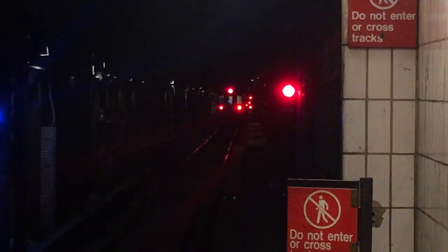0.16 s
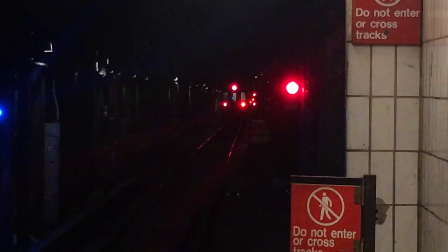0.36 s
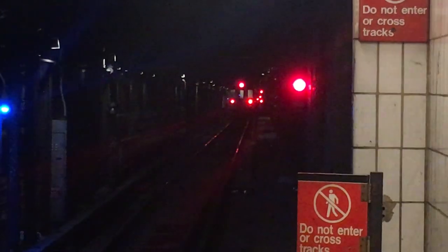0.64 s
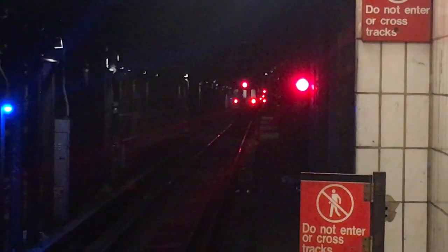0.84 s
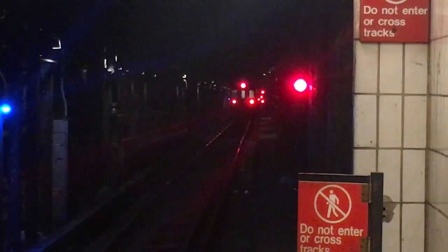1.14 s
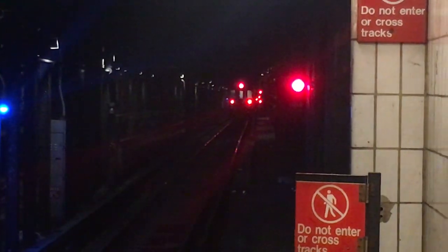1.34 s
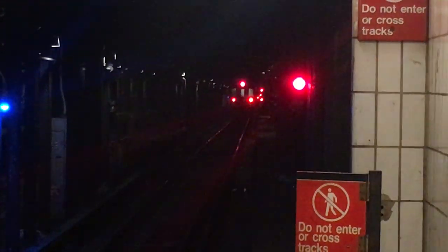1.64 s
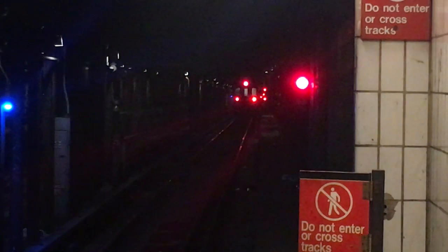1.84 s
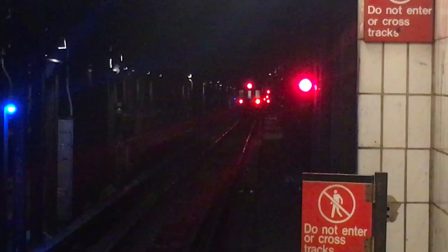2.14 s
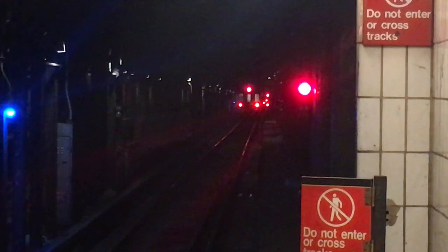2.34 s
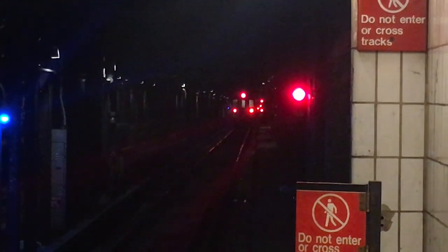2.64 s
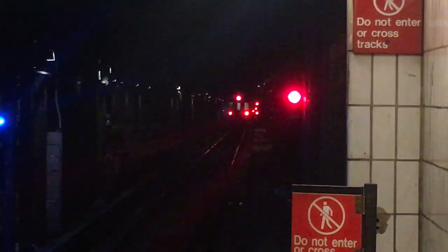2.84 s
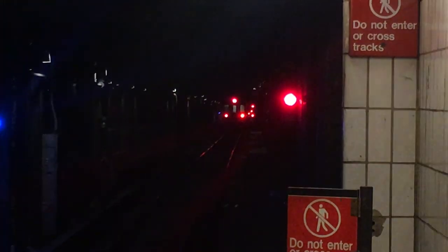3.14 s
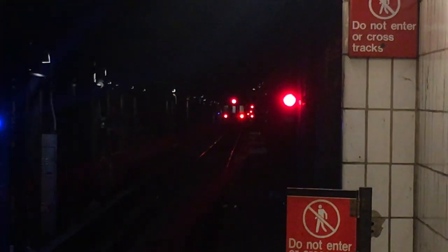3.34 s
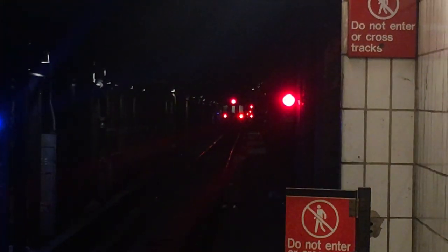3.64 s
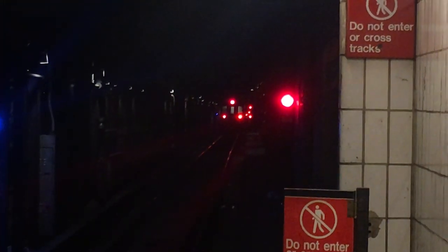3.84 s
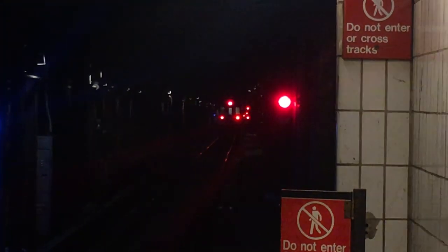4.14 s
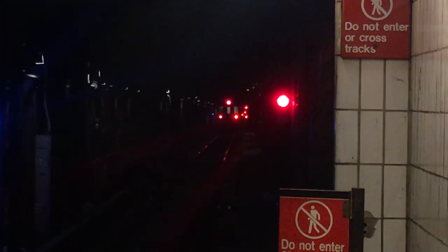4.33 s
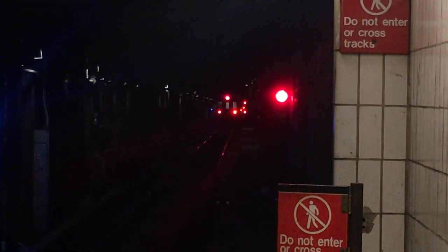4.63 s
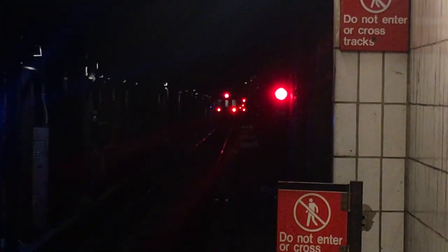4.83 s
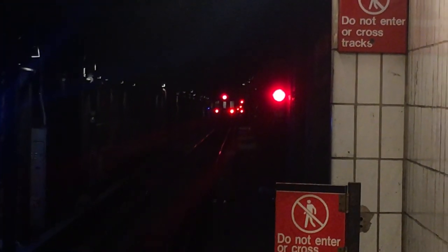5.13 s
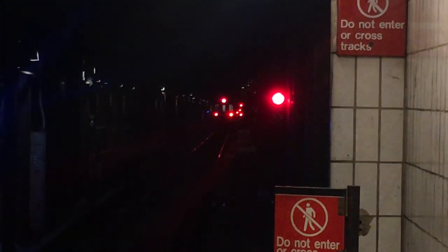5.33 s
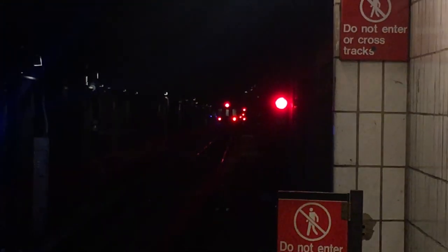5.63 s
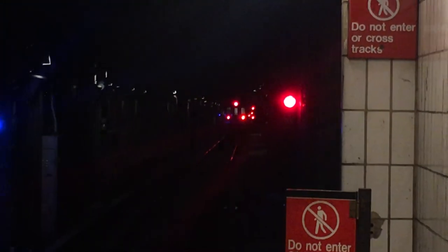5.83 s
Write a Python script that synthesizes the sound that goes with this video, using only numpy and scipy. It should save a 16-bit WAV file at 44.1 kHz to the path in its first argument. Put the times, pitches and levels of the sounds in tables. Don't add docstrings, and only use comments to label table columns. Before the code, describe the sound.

Low, thudding rumble of a receding subway train booms through a tunnel, with faint metallic chirps and scrapes over soft hiss.

```python
import sys
import numpy as np
from scipy import signal
from scipy.io import wavfile
from scipy.ndimage import uniform_filter1d

SR = 44100
rng = np.random.default_rng(int(sys.argv[2]) if len(sys.argv) > 2 else 0)


def to_linear_factor(level_db):
    exponent = np.asarray(level_db, float) / 20
    return 10 ** exponent


def to_wav(s):
    ch = np.atleast_2d(s).T
    pcm = np.round(np.clip(ch, -1, 1) * 32767)
    wavfile.write(sys.argv[1], SR, pcm.astype(np.int16))


N = 263704
TIME = np.arange(N) / SR


def evened(x):
    return x / np.sqrt(np.mean(x ** 2) + 1e-20)


def read(points, hz):
    f, value = np.transpose(points)
    return np.interp(np.log(hz + 1), np.log(f + 1), value)


def singing(count, hz, width_hz, steady):
    r = np.exp(-np.pi * width_hz / SR)
    settle = 4000
    noise = rng.standard_normal((count + settle, 2)) @ [1, 1j]
    envelope = signal.lfilter([1], [1, -2 * r, r * r], noise)[settle:]
    swell = uniform_filter1d(abs(envelope) ** 2, round(.06 * SR))
    envelope = envelope / swell ** (np.clip(steady, 0, 1) / 2)
    phase = 2 * np.pi * np.cumsum(hz * np.ones(count)) / SR
    return evened((envelope * np.exp(1j * phase)).real)


def field(gain_db):
    frames, hz = N // 256 + 5, np.fft.rfftfreq(1024, 1 / SR)
    a, b = rng.standard_normal((frames, 513, 2)).T
    z = (a + 1j * b) * to_linear_factor(gain_db(hz[:, None], np.arange(frames) * 256 / SR))
    return signal.istft(z, nperseg=1024, noverlap=768)[1][:N]


def patches(patchy_db):
    chance = rng.standard_normal((N // 256 + 5, 513)).T
    smooth = uniform_filter1d(chance, size=14, axis=0)
    smooth = uniform_filter1d(smooth, size=12, axis=1)
    return patchy_db * evened(smooth)


def boom():
    # [f/Hz, width/Hz, steadiness 0-1]
    modes = [(62.7, 40, 0.6), (130.95, 35.4, 0.5), (201.2, 63.6, 0)]
    # [level at start/dB, rise (negative: fall)/(dB/s), swell length/s]
    beds = [(-36, 0.42, 0.026), (-32.5, 0.32, 0.03), (-36.5, -0.26, 0.029)]
    # [t/s, level/dB]
    thuds = [(0.021, -27), (.22, -34), (.29, -29.5), (.63, -28.5), (1.05, -29), (1.61, -28), (1.93, -27),
             (3.24, -33.5), (3.4, -26.5), (4.02, -35.5), (4.09, -31.5), (4.63, -36), (4.82, -28.5),
             (5.28, -30.5), (5.92, -34.5)]
    # [t/s, level/dB]
    jolts = [(0.019, -25.5), (0.169, -27), (.25, -26.5), (.4, -28), (.6, -27.5), (.73, -28), (.89, -26),
             (1.04, -29), (1.17, -21.5), (1.3, -27.5), (1.44, -23.5), (1.729, -27.5), (1.8, -27),
             (1.92, -31), (2.11, -31.5), (2.35, -26), (2.46, -29), (2.541, -28.5), (2.64, -28), (2.82, -27),
             (3.11, -28), (3.22, -26.5), (3.5, -28.5), (3.709, -25.5), (3.87, -29.5), (4.05, -29),
             (4.23, -27.5), (4.38, -24.5), (4.8, -34.5), (5.249, -32.5)]
    # [t/s, level/dB]
    knocks = [(.31, -30.5), (.6, -31.5), (1.45, -32.5), (1.72, -35), (2.04, -32.5), (2.16, -33.5),
              (2.42, -35), (2.75, -33.5), (3.18, -33), (4.38, -41.5), (5.4, -39)]
    out = np.zeros(N)
    for blows, (bed_db, fade_db_per_s, length_s), mode in zip((thuds, jolts, knocks), beds, modes):
        swells = np.zeros(N)
        for t_s, db in blows:
            swells += to_linear_factor(db) * np.exp(-.5 * ((TIME - t_s) / length_s) ** 2)
        bed = to_linear_factor(bed_db + fade_db_per_s * TIME)
        out += np.hypot(bed, swells) * singing(N, *mode)
    return out


def roll():
    # [f/Hz, density/dB per Hz]
    rail = [(150, -25.5), (235, 15), (345, 10), (380, -0.5), (520, 0), (710, 2), (1000, -4), (1300, -9),
            (1900, -9.5), (2350, -16.5), (3400, -19), (3900, -23.5), (6000, -40), (12000, -74.5)]
    level_db, fade_db_per_s = -44, -0.2438
    bright_db_per_octave, dulling_db_per_s = 1.43, -0.27
    blotch_db = patches(0.51)

    def gain_db(hz, t):
        octaves = np.log2(np.clip(hz, 1000, 4000) / 1000)
        tilt_db = octaves * (bright_db_per_octave + dulling_db_per_s * t)
        return read(rail, hz) + tilt_db + blotch_db

    return to_linear_factor(level_db + fade_db_per_s * TIME) * evened(field(gain_db))


def rub_tones(rubs, q):
    out = np.zeros(N)
    for t_s, length_s, hz, db in rubs:
        tone = singing(SR // 3, hz, hz / q, 0.38)
        u = np.arange(len(tone)) / SR / length_s
        rub = np.interp(u, [0, .42, 1], [.1, 1, .35])
        rub *= to_linear_factor(-60 * np.maximum(u - 1, 0) * length_s / 0.35)
        part = out[round(t_s * SR):][:len(tone)]
        part += (to_linear_factor(db) * rub * tone)[:len(part)]
    return out


def flange_rubs():
    # [t/s, length/s, f/Hz, level/dB]
    squeaks = [(.052, .08, 3320, -69), (.238, 0.1, 3310, -64.5), (.313, 0.046, 1820, -63),
               (2.47, 0.035, 3350, -65.5), (.45, .045, 3280, -65), (.54, 0.14, 1650, -58),
               (.543, 0.1, 3310, -67), (3.22, .06, 2970, -67.5), (.679, 0.06, 2810, -64),
               (.885, 0.075, 2280, -66), (.99, .055, 4100, -66.5), (1.052, 0.062, 4070, -63.5),
               (1.39, 0.062, 3490, -66), (1.55, 0.075, 4160, -69), (1.831, 0.08, 4160, -73.5),
               (1.834, 0.19, 1964, -61), (2.046, 0.041, 1940, -53), (2.15, .08, 3090, -70),
               (2.144, 0.11, 4030, -61), (2.213, 0.065, 4000, -70), (2.27, 0.053, 3030, -66),
               (2.392, .055, 3190, -65.5), (2.586, 0.08, 4150, -73), (2.717, .064, 3340, -73),
               (3.39, 0.045, 3420, -65), (3.7, 0.073, 3420, -68), (4.345, 0.043, 3200, -68),
               (5.062, 0.08, 3250, -67), (5.222, .07, 4100, -63), (5.27, .05, 2660, -69)]
    # [t/s, length/s, f/Hz, level/dB]
    chirps = [(.456, .044, 4900, -72), (.54, .05, 4900, -72), (.584, .06, 4860, -67),
              (.691, .044, 4640, -75.5), (.778, .05, 4850, -73), (.84, 0.059, 5120, -70.5),
              (.88, 0.076, 4850, -74), (.96, .07, 4800, -71), (1.039, .13, 4740, -74),
              (1.218, .065, 5500, -76), (1.245, .055, 4800, -72), (1.41, 0.066, 5510, -73),
              (1.843, .075, 4660, -71), (1.916, 0.074, 4640, -76), (2.011, .12, 5140, -78),
              (2.137, 0.1, 5080, -70.5), (2.147, .12, 4680, -70.5), (2.307, .12, 4780, -70.5),
              (2.71, 0.064, 4650, -76), (4.017, .055, 4850, -74.5), (4.339, 0.032, 4630, -67),
              (4.682, 0.099, 4640, -68.5), (4.833, 0.052, 4720, -70), (5.049, .086, 4850, -67),
              (5.142, .06, 4750, -72), (5.158, 0.17, 7320, -84), (5.25, .08, 4660, -68),
              (5.2, .05, 4720, -73), (3.9, .08, 4850, -77.5)]
    # [t/s, length/s, centre f/Hz, level/dB]
    scrapes = [(.05, .15, 3300, -71), (.5, .15, 2920, -68), (2.05, .055, 2130, -57.5),
               (2.1, .14, 4900, -73.5), (2.3, 0.12, 3240, -65.5), (2.56, .07, 2200, -62.5),
               (2.95, .15, 1900, -65), (4.15, .06, 2930, -68), (4.34, .05, 3520, -72),
               (4.66, .12, 3090, -66.5), (4.83, .06, 4550, -77), (5.19, .14, 4060, -65.5),
               (2.1, .2, 3000, -65)]
    return rub_tones(squeaks, q=45) + rub_tones(chirps, q=40) + rub_tones(scrapes, q=7.1)


def squeals():
    # [t/s, level/dB, f/Hz]
    tracks = [
        [(.1, -76, 4000), (.35, -66.5, 4030), (.42, -83, 3970), (.7, -72, 4020), (.78, -76, 4030)],
        [(.4, -78, 4900), (.48, -74.5, 4870), (1, -73.5, 4830), (1.15, -77, 4640)],
        [(1.15, -84.5, 5220), (1.27, -73.5, 5400), (1.544, -71, 5320), (1.556, -66, 5200), (1.6, -79, 5320),
         (1.712, -84, 5350), (1.762, -66, 5330), (1.808, -79.5, 5230), (2.1, -75.5, 5360)],
        [(1.22, -72, 3590), (1.262, -57, 3664), (1.3, -66, 3500), (1.35, -63, 3490), (1.42, -56, 3500),
         (1.58, -80, 3500)],
        [(2.95, -74, 3490), (3.186, -62.5, 3500), (3.386, -80.5, 3470), (3.414, -65.5, 3436),
         (3.54, -83.5, 3450), (3.758, -68, 3390), (3.836, -82, 3460), (4.064, -70, 3480), (4.1, -80, 3450)],
        [(4.95, -80, 4130), (5.03, -70, 4210), (5.14, -71, 4090), (5.19, -60, 4070), (5.28, -57.5, 4110),
         (5.404, -69, 4230), (5.5, -76, 4100)],
    ]
    out = np.zeros(N)
    for track in tracks:
        t_s, db, hz = np.transpose(track)
        t = np.arange(t_s[0], t_s[-1], 1 / SR)
        tone = singing(len(t), np.interp(t, t_s, hz), 115, .6)
        tone *= to_linear_factor(np.interp(t, t_s, db) - 6)
        out[round(t_s[0] * SR):][:len(t)] += tone * signal.windows.tukey(len(t), .15)
    return out


def ringing():
    # [f/Hz, width/Hz, level/dB, flicker/dB]
    modes = [(194, 8, -44, 2.5), (713, 50, -64, 2.5), (1900, 150, -70, 3), (3400, 120, -76, 2.5),
             (4070, 130, -83, 2.5), (4660, 140, -88, 2.2), (4850, 110, -89, 2.2)]
    # [t/s, level/dB]
    pressure = [(0, -7.5), (.6, 1.5), (1.1, 0.5), (1.5, 2.5), (1.9, 2.5), (2.3, 2.5), (2.7, 1), (3.3, -2.5),
                (4, -1.5), (4.5, -5), (4.8, 0.5), (5.2, -1.5), (5.6, -7), (6, 2.5)]
    out = np.zeros(N)
    for hz, width_hz, db, flicker_db in modes:
        graze = uniform_filter1d(rng.standard_normal(N), size=2000)
        graze = evened(uniform_filter1d(graze, size=2000))
        out += to_linear_factor(db + flicker_db * graze) * singing(N, hz, width_hz, 0.2)
    return to_linear_factor(np.interp(TIME, *np.transpose(pressure))) * out


def microphone_hiss():
    # [f/Hz, density/dB per Hz]
    spectrum = [(3000, -6), (5000, 1), (6000, 0), (7200, -4), (7600, -8), (8000, -6), (10000, -11),
                (10450, -17), (11000, -13), (15700, -19)]
    level_db = -76
    return to_linear_factor(level_db) * evened(field(lambda hz, t: read(spectrum, hz) + 0 * t))


def scene():
    return (boom() + roll() + flange_rubs() + squeals() + ringing())[None]


def roll_off(x):
    return signal.sosfilt(signal.butter(12, 15720, fs=SR, output="sos"), x)


def record(dry):
    bass_cut = signal.butter(6, 38, "high", fs=SR, output="sos")
    cut = signal.sosfilt(bass_cut, dry)
    cut = 0.32 * np.tanh(cut / .3)
    return roll_off(cut + microphone_hiss())


dry = scene()
out = record(dry)
to_wav(out)
```